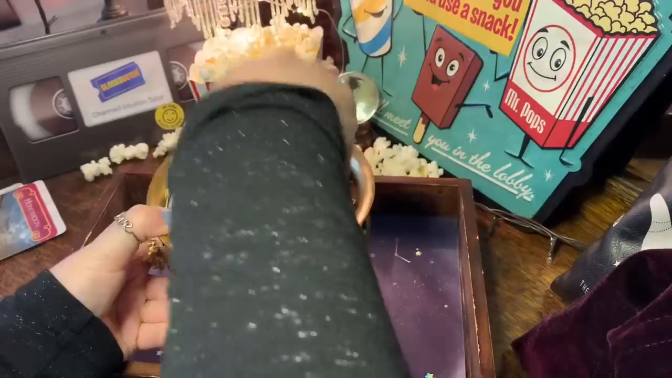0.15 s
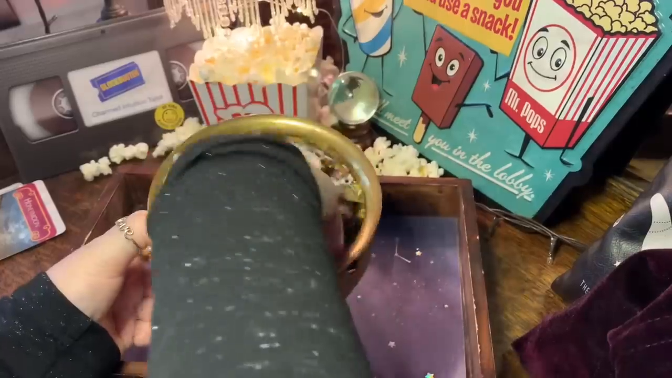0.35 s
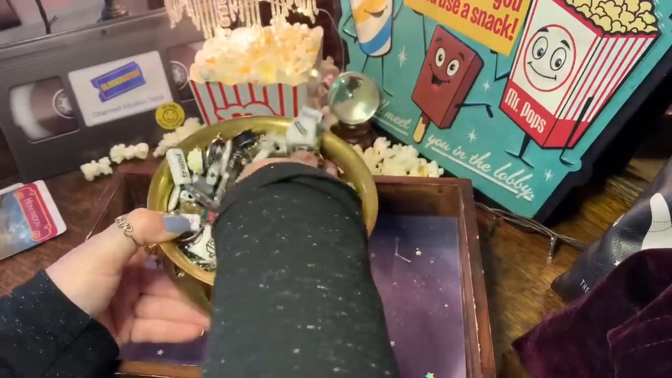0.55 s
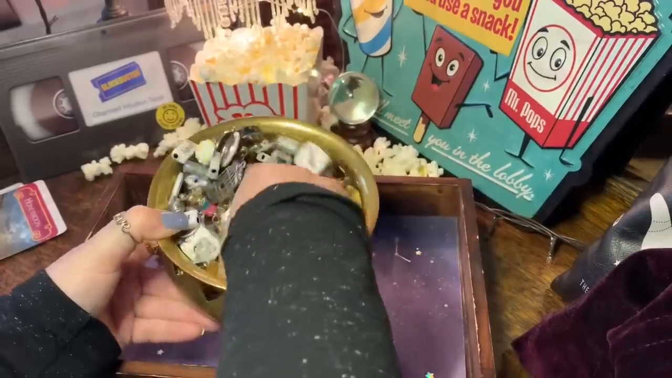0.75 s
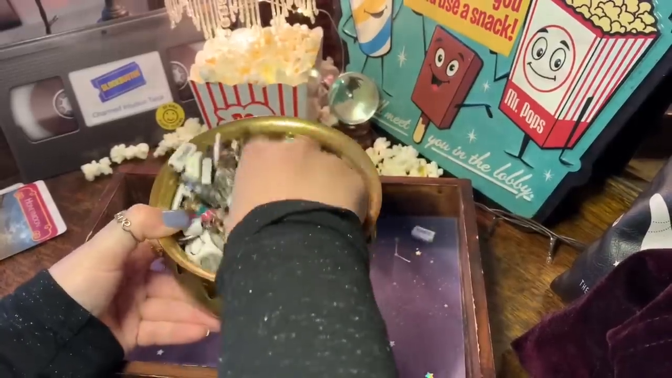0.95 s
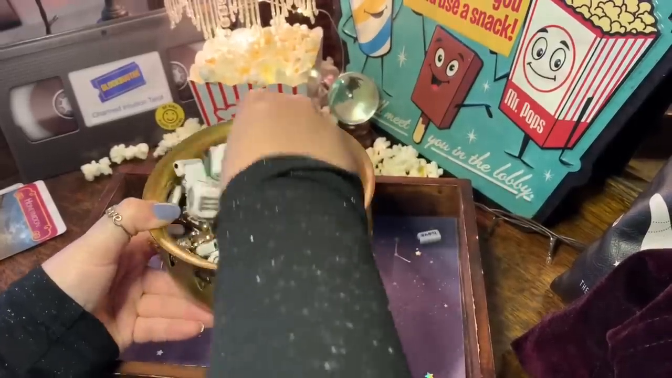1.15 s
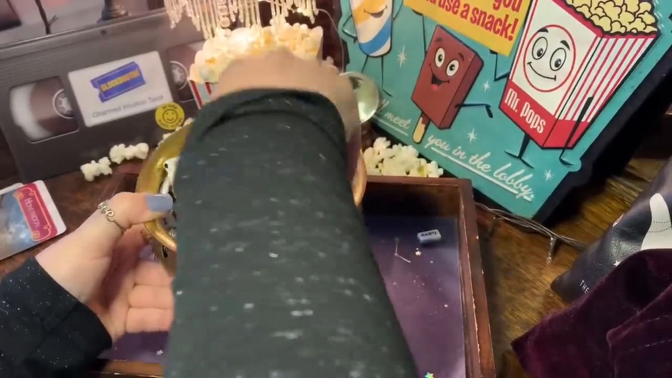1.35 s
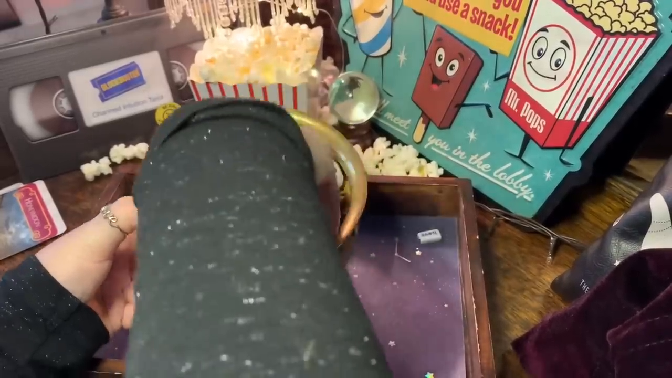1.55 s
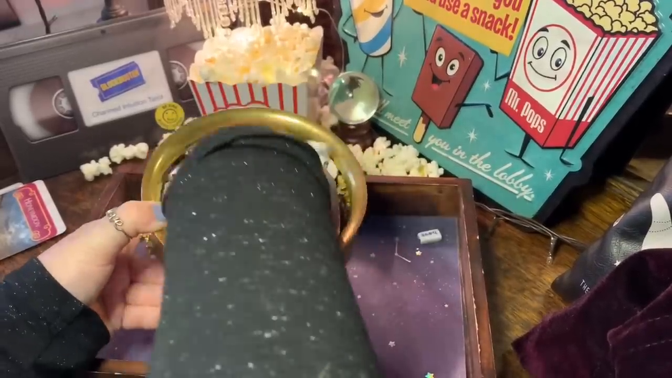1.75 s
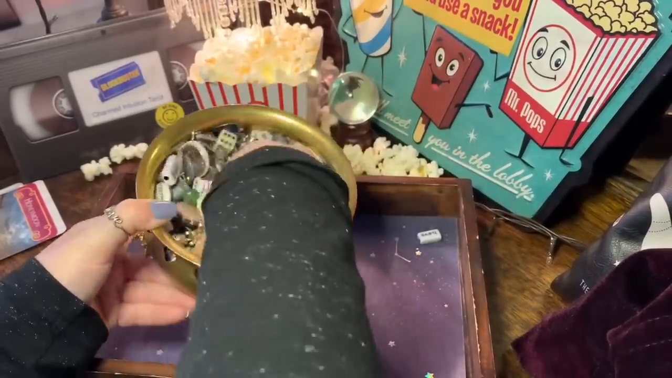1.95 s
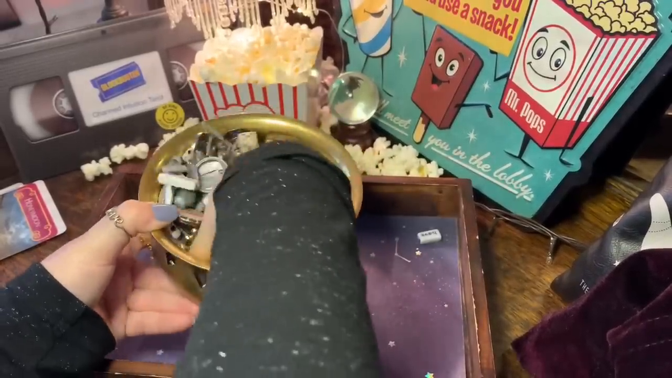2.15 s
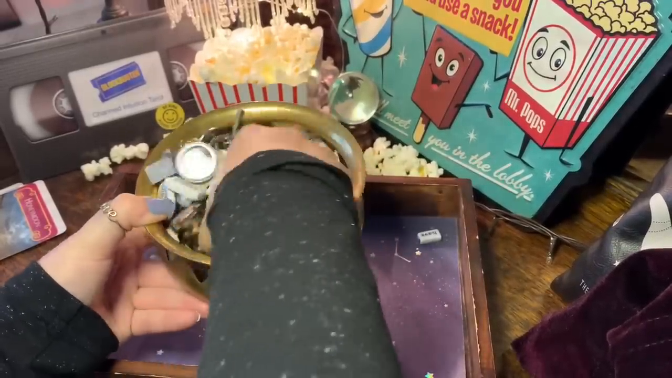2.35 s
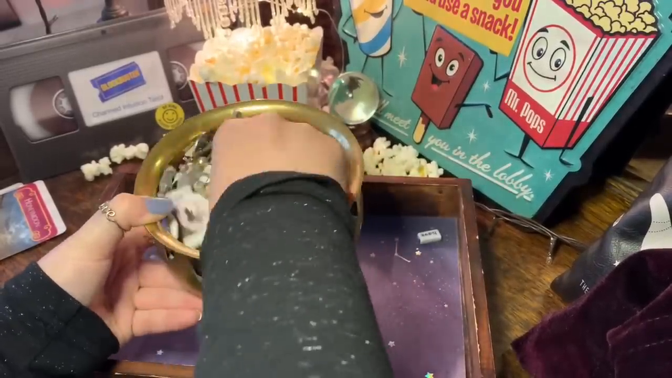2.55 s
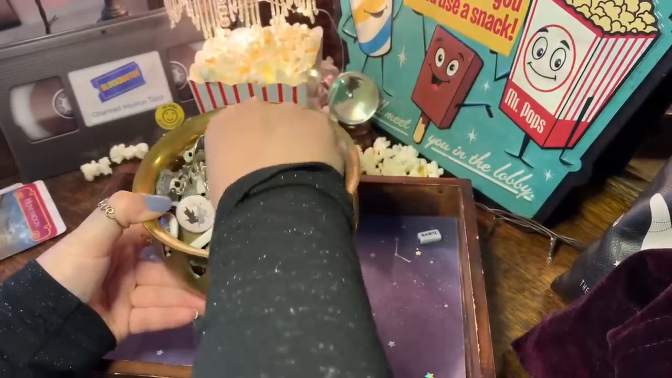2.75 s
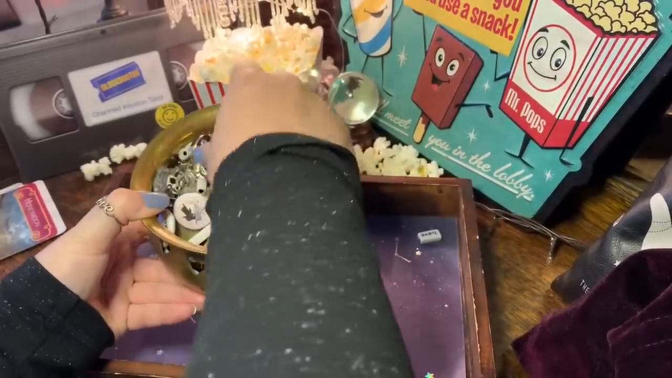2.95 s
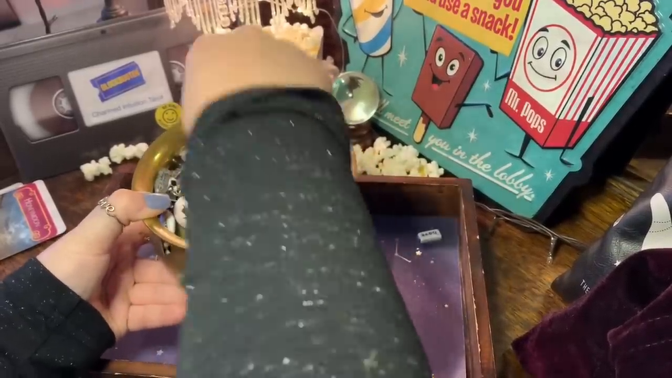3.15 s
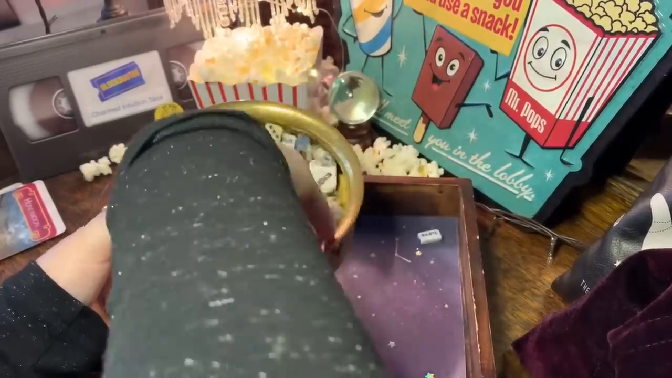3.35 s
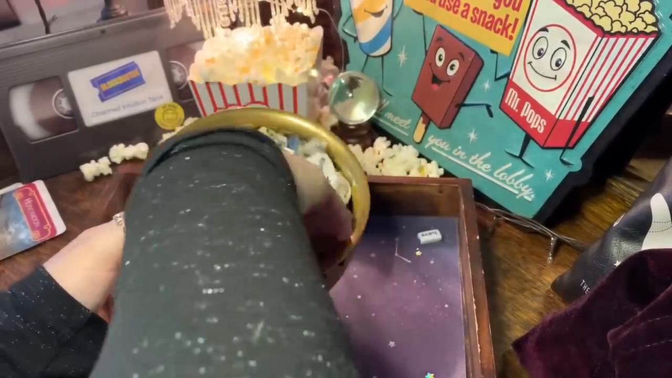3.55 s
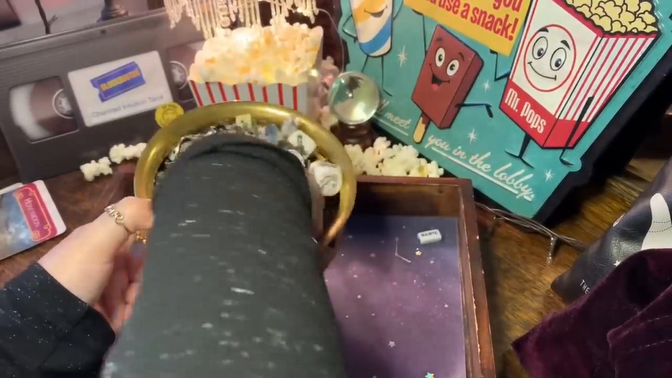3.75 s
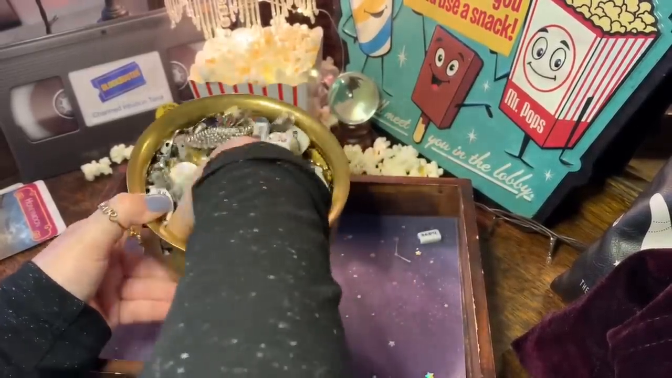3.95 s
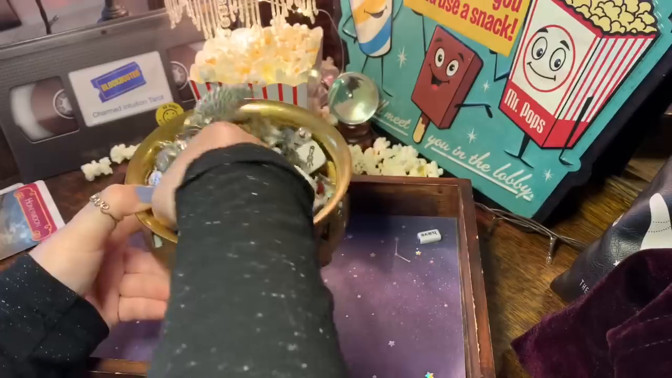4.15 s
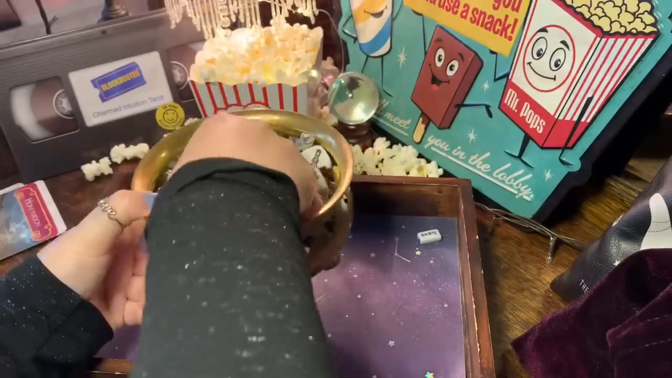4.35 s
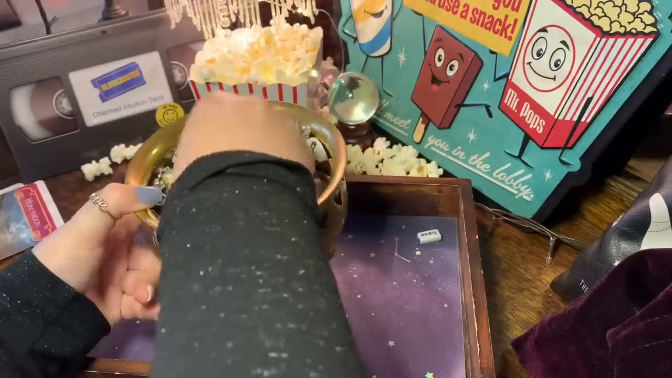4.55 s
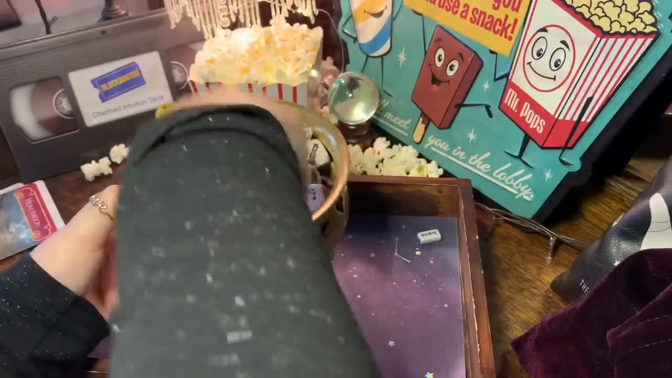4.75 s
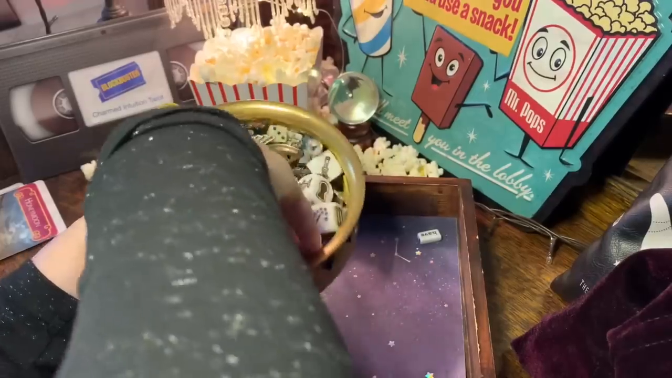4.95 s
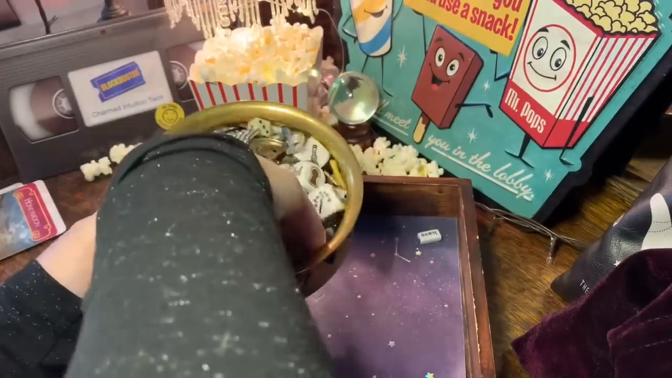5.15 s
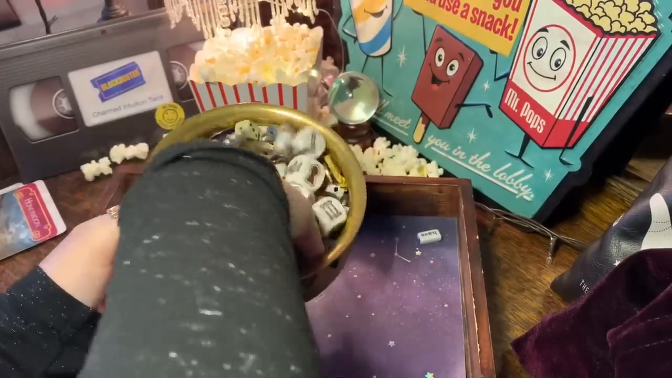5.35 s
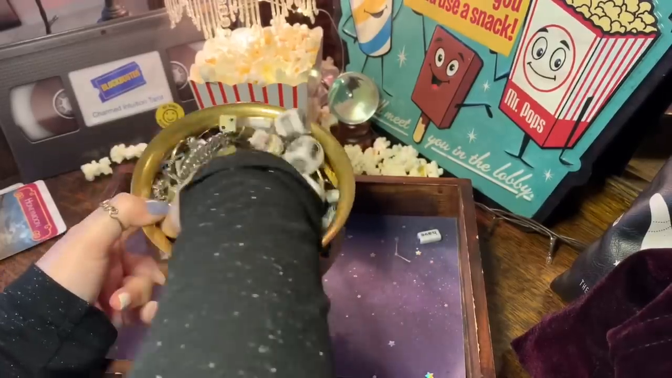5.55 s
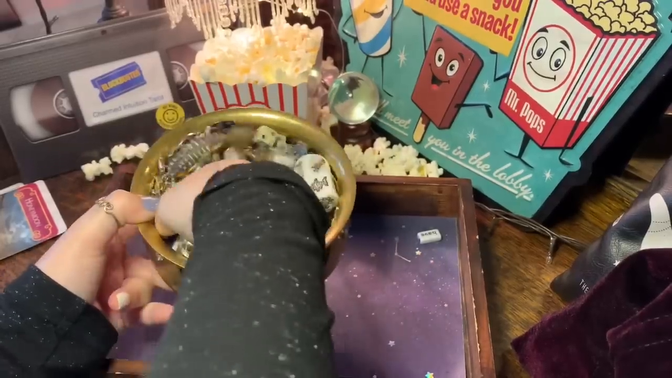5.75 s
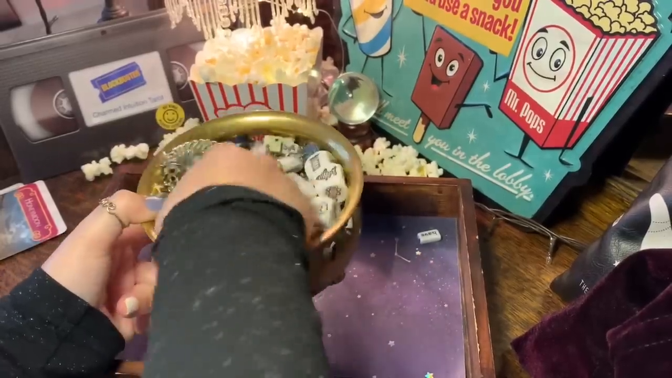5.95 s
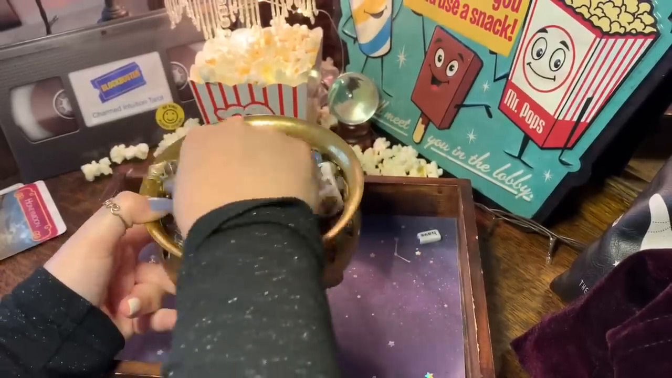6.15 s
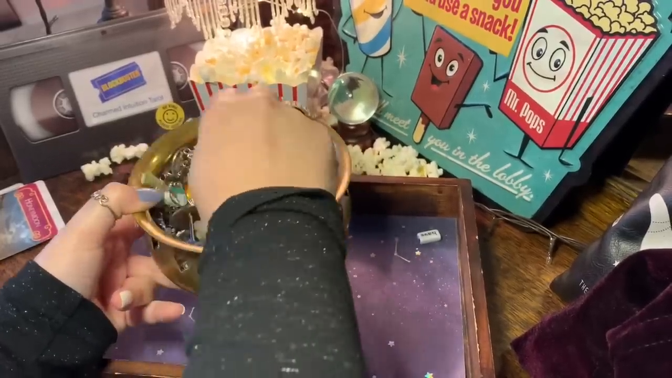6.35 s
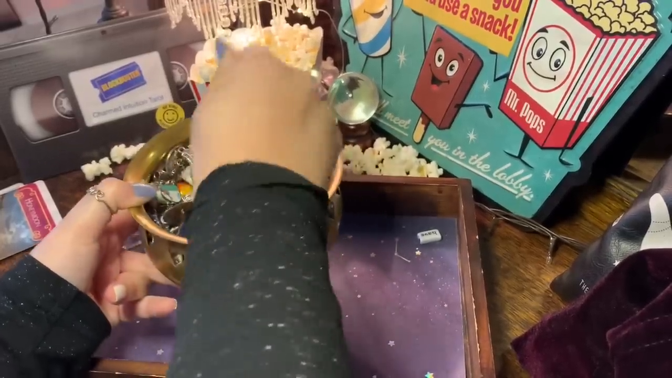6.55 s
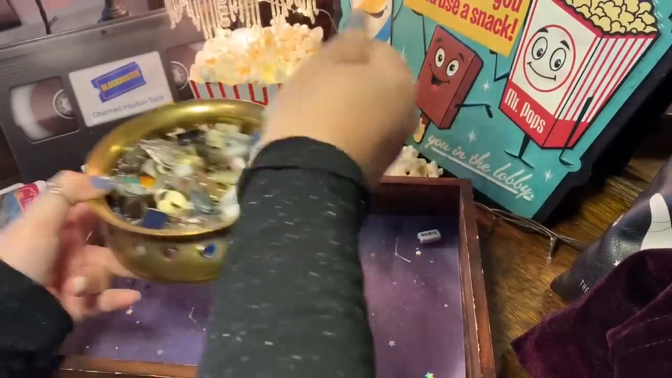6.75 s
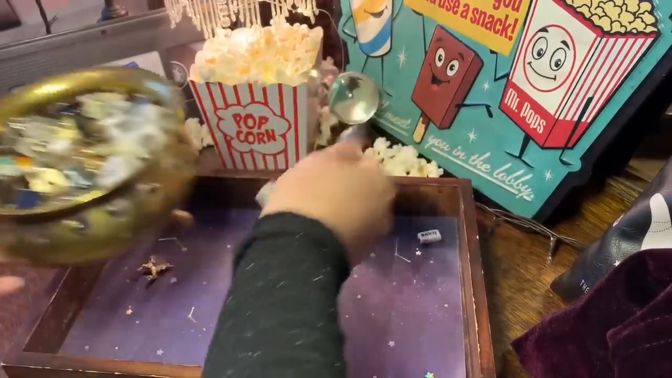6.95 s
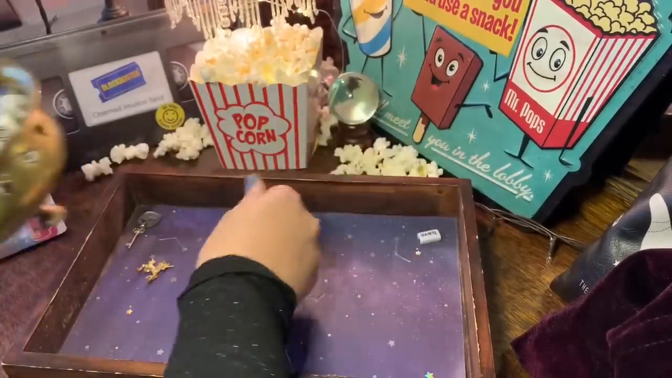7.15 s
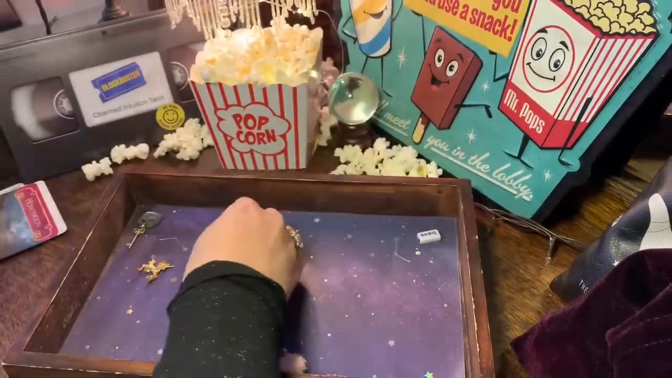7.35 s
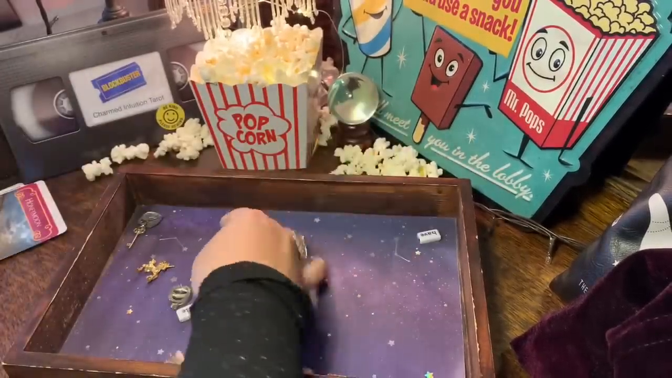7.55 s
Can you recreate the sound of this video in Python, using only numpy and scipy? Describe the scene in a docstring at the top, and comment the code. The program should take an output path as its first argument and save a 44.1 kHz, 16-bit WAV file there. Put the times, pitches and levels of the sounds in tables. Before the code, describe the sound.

Dense, glittering clinks of trinkets churned in a brass bowl, a few woody bumps, a brief pause, then a short rattling drop onto wood.

```python
"""Stirred charms in a brass bowl

A hand stirs small metal charms and tiles in a brass bowl held over a wooden tray, in a small room.
The heap jangles by dense random contacts; single charms clink, and click-driven modes make metal ring.
The bowl bumps the tray a few times, exciting its wooden modes. After a short pause a handful is let go
and clatters into the tray. Reflections and a low rumble of air, both filtered noise, surround it all."""
import sys
import numpy as np
from scipy import signal
from scipy.fft import rfft, irfft, next_fast_len
from scipy.io import wavfile
from scipy.ndimage import uniform_filter1d, map_coordinates

SR = 44100
rng = np.random.default_rng(int(sys.argv[2]) if len(sys.argv) > 2 else 0)


def digitize_waveform(pressure):
    """Quantize a signal to 16-bit integers and store it at the path in sys.argv[1].

    Rows of a 2-D input are taken as channels; values are limited to [-1, 1].
    """
    field = np.atleast_2d(pressure).T
    bounded = np.clip(field, -1, 1)
    quanta = np.round(bounded * 32767).astype(np.int16)
    wavfile.write(sys.argv[1], SR, quanta)


N = 336041
SIZE = next_fast_len(N + SR)  # transform length, with a second of space for the tails
HZ = np.arange(SIZE // 2 + 1) * SR / SIZE

# Modes of the brass bowl, damped by hand and heap.
# Each row: frequency in Hz, bandwidth in Hz, relative level in dB.
BOWL_MODES = [(759, 33, -12), (860, 70, -10.5), (1000, 60, -2), (1098, 38, 0), (1260, 60, -15),
              (1690, 50, -7.5), (1970, 70, -6.5), (2580, 90, -6), (4070, 77, -8), (7050, 200, -2)]
# Modes of the wooden tray above its lowest one.
# Each row: frequency in Hz, bandwidth in Hz, relative level in dB.
TRAY_MODES = [(220, 15, -5), (308.6, 23, -2), (351, 46, 0), (503, 67, -15.5), (678, 57, -2.5), (986, 43, 1),
              (1203, 150, -7), (1580, 160, 4), (1727, 31, -2.5), (1966, 500, 4.5)]
# Spectrum of the bright tick of charm on charm. Each row: frequency in Hz, relative density in dB.
TICK_SPECTRUM = [(1000, -73), (4000, -5.5), (6500, -0.5), (8200, 3), (10500, 2.5), (12500, 1.5),
                 (14500, -2.5), (15700, -1.5), (16000, -23)]
# Spectrum of the clack of pieces. Each row: frequency in Hz, relative density in dB.
CLACK_SPECTRUM = [(300, -24), (800, -6), (1500, -1), (2800, 2), (4200, 7.5), (6000, 4.5), (7500, -38.5),
                  (10000, -21), (16000, -33.5)]
# Spectrum of pieces rubbing or rattling on brass. Each row: frequency in Hz, relative density in dB.
RUB_SPECTRUM = [(150, -38.5), (400, -14), (700, -5), (1000, 5.5), (1400, -2), (2200, -7.5), (3200, -13.5),
                (6000, -1.5), (16000, -41.5)]
# Spectrum of blows on wood. Each row: frequency in Hz, relative density in dB.
WOOD_SPECTRUM = [(100, -29), (200, -1.5), (500, 1.5), (1000, -2), (2000, 7.5), (3000, 8.5), (4800, -2.5),
                 (7000, 0.5), (10000, -19), (16000, -36.5)]

JANGLE_FADE_S, CLACK_FADE_S = 0.0035, 0.0014  # amplitude time constants of one contact


def stirred_heap():
    """Granular contact: charms jangle, tiles clack and the heap drags over brass in many random impacts."""
    jangle, clack, rub = sliding()
    touches = collisions(per_s=700, spread_db=2.0)
    charm_hits, tile_hits = touches * jangle, touches * clack
    ticks = from_db(1.0) * colour(chatter(charm_hits, JANGLE_FADE_S), TICK_SPECTRUM)
    tiles = from_db(-8.5) * colour(chatter(tile_hits, CLACK_FADE_S, channels=2), CLACK_SPECTRUM)

    drag = collisions(per_s=400, spread_db=1.5) * rub
    brass = from_db(0.5) * bowl(collisions(per_s=130, spread_db=0.6) * rub)
    scrape = from_db(-9.0) * colour(chatter(drag, fade_s=0.00096, channels=2), RUB_SPECTRUM)

    rings = from_db(0.5) * charm_rings(charm_hits, 7930, 12640, width_hz=18, count=1, size=400)
    rings += from_db(-1.5) * charm_rings(charm_hits, 13400, 15600, width_hz=16, count=1, size=300)
    tile_rings = from_db(-5.0) * charm_rings(tile_hits, 3503, 7840, width_hz=17, count=2, size=300)
    tile_rings += from_db(-10.5) * charm_rings(tile_hits, 1487, 4540, width_hz=35, count=1)
    return ticks + tiles + brass + scrape + rings + tile_rings + tinks(jangle, clack)


def sliding():
    """Incoherent superposition: each push swells and settles, and overlapping slides add in power."""
    # Pushes of the hand. Each row: start in seconds, push length in seconds, settling time in seconds,
    # then relative levels in dB of charm jangle, tile clack and heap rubbing on brass.
    pushes = [(0.0, 0.0017, 0.21, -29.5, -38, -40.5), (0.194, 0.094, 0.4, -28.5, -32, -39),
              (0.394, 0.06, 0.15, -28, -30.5, -38), (0.538, 0.054, 0.26, -33.5, -34, -31.5),
              (0.664, 0.039, 0.17, -27, -30, -31), (0.799, 0.12, 0.19, -25, -27.5, -33),
              (1.02, 0.041, 0.66, -33.5, -37, -43), (1.204, 0.029, 0.17, -29.5, -39.5, -42.5),
              (1.447, 0.13, 0.11, -29, -31.5, -37.5), (1.88, 0.026, 0.24, -26.5, -28.5, -30),
              (2.027, 0.051, 0.15, -31.5, -32, -39.5), (2.2, 0.045, 0.46, -30, -30.5, -36),
              (2.318, 0.091, 0.54, -29.5, -35, -38), (2.5, 0.17, 0.39, -41, -54, -36.5),
              (2.925, 0.028, 0.15, -26, -31.5, -31), (3.04, 0.065, 0.22, -41, -41, -53),
              (3.184, .03, 0.68, -35, -40.5, -41), (3.312, 0.035, 0.15, -28.5, -30.5, -35),
              (3.468, 0.079, 0.25, -30, -31, -35.5), (3.683, 0.015, 0.29, -26, -27.5, -30.5),
              (3.865, 0.17, 0.68, -28, -30, -35.5), (4.366, 0.085, 1, -40, -42, -50),
              (4.564, 0.015, 0.11, -34.5, -37, -37.5), (4.704, 0.069, 0.23, -41, -43, -60),
              (4.781, 0.075, 0.086, -35.5, -37, -34), (4.92, 0.03, 0.22, -38.5, -42.5, -41),
              (5.118, 0.0083, 0.19, -33.5, -32.5, -36.5), (5.201, .1, 0.17, -33, -34, -38.5),
              (5.346, 0.074, 0.47, -26, -26, -32.5), (5.583, 0.1, 0.66, -30.5, -36.5, -42.5),
              (5.842, 0.065, 0.93, -29, -35, -34.5), (5.967, 0.088, 0.14, -35, -35, -50),
              (6.199, 0.026, 0.3, -37, -47, -50), (6.43, 0.013, 0.12, -52, -40, -61)]
    # The hand lying in the heap keeps it creeping. One row: jangle, clack and rub, relative levels in dB.
    creep_db = (-50, -49, -56)
    settle_drop_db, settle_bend = 27, 1.26  # drop within the settling time; slow at first, then faster
    hand_out_s, hand_lift_s = 6.62, 0.22  # motion is over at the first, having faded for the second
    t = np.arange(N) / SR
    power = from_db(creep_db)[:, None] ** 2 * np.ones(N)
    for start, push_s, settle_s, *levels_db in pushes:
        moving = (t >= start) & (t < start + push_s + 2 * settle_s)
        age = t[moving] - start
        swell = np.sin(np.pi / 2 * np.minimum(age / push_s, 1))
        settling = np.maximum(age - push_s, 0) / settle_s
        settle = from_db(-settle_drop_db * settling ** settle_bend)
        power[:, moving] += (from_db(levels_db)[:, None] * swell * settle) ** 2
    return np.sqrt(power) * np.clip((hand_out_s - t) / hand_lift_s, 0, 1)


def tinks(jangle, clack):
    """Sparse impact excitation: a sliding piece drops onto another with a tiny snap and a short ring."""
    drops = collisions(per_s=70, spread_db=0.5)
    charm_drops, tile_drops = drops * jangle, drops * clack
    snap = from_db(-6.5) * colour(charm_drops, TICK_SPECTRUM)
    snap += from_db(-12.0) * colour(tile_drops, CLACK_SPECTRUM)
    high = from_db(-4.0) * charm_rings(charm_drops, 9300, 12500, width_hz=40, count=2, size=100)
    low = from_db(-7.5) * charm_rings(tile_drops, 3500, 7500, width_hz=25, count=2, size=100)
    return snap + high + low


def clinks():
    """Hard impact: a broadband tick and clack excite the modes of the pieces and the bowl."""
    # Single charms striking. Each row: time in seconds, relative tick level in dB, relative clack level in dB.
    blows = [(0.016, -23, -51), (0.134, -29, -38), (0.246, -17, -29), (0.3, -14.5, -28), (0.392, -1.5, -37),
             (0.452, -4, -23.5), (0.539, -11, -27.5), (0.574, -14, -35), (0.641, -11, -8),
             (0.648, -12.5, -14), (0.691, -26, -31), (0.752, -25, -15), (0.770, -11, -15.5),
             (0.842, -18, -18.5), (1.049, -12, -38), (1.129, 0, -31), (1.236, -24, -40), (1.327, -6.5, -35),
             (1.431, -12, -26), (1.545, -23.5, -27), (1.694, -24, -54), (1.8, -21, -38), (1.895, -9.5, -24),
             (2.146, -7, -36), (2.225, -27, -25), (2.368, -19, -22), (2.479, -13, -29), (2.601, -27, -29),
             (2.653, -14, -32.5), (2.748, -26, -44), (2.940, -7, -25.5), (3.044, -6, -32.5),
             (3.201, -8, -32), (3.325, -10.5, -28), (3.433, -24, -37), (3.522, -20.5, -26),
             (3.558, -17, -26), (3.695, -6.5, -18.5), (3.759, -4, -25), (3.782, -9, -25),
             (3.797, -15, -20.5), (3.867, -11, -44), (3.922, -15.5, -34), (3.945, -25, -33),
             (3.976, -20, -26), (4.050, -7, -35), (4.256, -17.5, -24.5), (4.296, -9, -29),
             (4.393, -13.5, -42), (4.415, -14, -27), (4.448, -14, -29), (4.531, -7, -23), (4.589, -10, -41),
             (4.68, -21, -50), (4.712, -17, -29), (4.803, -12, -41), (4.855, -9, -25), (4.931, -10, -37),
             (5.040, -13, -24), (5.136, -8, -20.5), (5.273, -24, -32), (5.38, -5, -27), (5.576, -8.5, -22),
             (6.192, -6, -38), (6.229, -4, -37), (6.301, -21, -29), (6.339, -14.5, -42),
             (6.429, -31, -14.5), (6.44, -7, -17), (6.547, -28, -38), (6.619, -35, -54),
             (7.034, -25.5, -52), (7.230, -28, -14), (7.364, -19, -34), (7.388, -9.5, -18),
             (7.4085, -4.5, -20), (7.476, -20, -40), (7.513, -23, -38)]
    s, tick_db, clack_db = np.transpose(blows)
    tick, clack = strikes(s, tick_db), strikes(s, clack_db)
    out = from_db(11.0) * colour(chatter(biting(tick), fade_s=0.0058), TICK_SPECTRUM)
    burst = chatter(biting(clack), fade_s=0.0016)
    out += from_db(18.0) * colour(burst, CLACK_SPECTRUM)
    out += from_db(7.5) * body(burst, BOWL_MODES)
    out += from_db(11) * charm_rings(clack, 2300, 3600, width_hz=85, count=6, size=60)
    out += from_db(8.5) * charm_rings(tick, 6563, 15990, width_hz=15, count=8, size=60)
    out += from_db(9.5) * charm_rings(clack, 2350, 7340, width_hz=120, count=9, size=60)
    return out


def wall_knocks():
    """Impulse response: a piece thrown against the wall rings the bowl and rattles briefly on it."""
    # Pieces knocking on the brass wall. Each row: time in seconds, relative level in dB.
    knocks = [(0.096, -44), (0.264, -31), (0.301, -37.5), (0.935, -30.5), (1.238, -35), (1.446, -41),
              (1.643, -40.5), (1.897, -25.5), (2.563, -31), (2.945, -30), (3.335, -28.5), (3.391, -36),
              (3.471, -41), (3.643, -32.5), (3.697, -22), (3.944, -27.5), (4.583, -39.5), (5.137, -23.5),
              (5.274, -33.5), (5.694, -38), (5.976, -34), (6.037, -32), (6.137, -36), (6.234, -37),
              (6.345, -38)]
    blows = strikes(*np.transpose(knocks))
    rattle = colour(chatter(blows, fade_s=0.0061), RUB_SPECTRUM)
    return from_db(27) * bowl(blows) + from_db(21) * rattle


def bowl(x):
    """Modal resonance with Doppler-like bending: a varying delay shifts pitch as hand and heap press."""
    bend, bend_hz = 0.022, 11.55  # nominal pitch deviation as a share; upper rate of the drift
    lag = drift(bend_hz) * bend * SR / (2 * np.pi * bend_hz)  # samples
    return map_coordinates(np.ravel(body(x, BOWL_MODES)), [np.arange(N) - lag], order=3)


def chimes():
    """Free damped oscillation: a charm that swings free, or the bowl itself, holds one pure, exponentially
    dying note."""
    # Ringing charms, and at 6.441 s the bowl's faint 2425 Hz ring. Each row: start in seconds, pitch in Hz,
    # relative level in dB, 60 dB decay in seconds.
    notes = [(0.002, 9660, -19, .25), (0.002, 11260, -19.5, .23), (1.129, 6985, -33, .35),
             (1.226, 9850, -16, .18), (1.236, 12050, -18, .13), (1.251, 15330, -23, .25),
             (1.29, 11240, -25, .3), (2.96, 14880, -24, .25), (2.978, 15250, -20, .2),
             (3.046, 4590, -36, 1.1), (3.165, 4600, -37, .5), (3.167, 12400, -28, .3),
             (4.531, 12300, -35, .2), (6.228, 15130, -23, .2), (6.441, 14790, -25, .15),
             (6.441, 2425, -63, 1.6), (7.389, 14900, -25, .25), (7.409, 15350, -27, .25)]
    age, out = np.arange(SR) / SR, np.zeros(N)
    for s, hz, db, t60 in notes:
        at = max(round(s * SR), 0)
        note = from_db(db - 60 * age / t60) * np.sin(2 * np.pi * hz * age)
        out[at:at + len(age)] += note[:N - at]
    return out


def handful():
    """Modal excitation by impacts: landing pieces thud, knock and clack on the thin floor, then tumble."""
    # Pieces landing in the tray. Each row: time in seconds, then relative levels in dB
    # of the floor's thud, the wood's knock and the piece's clack.
    landings = [(7.1175, -46, -43, -47), (7.1222, -30, -20.5, -16), (7.125, -38, -26, -27),
                (7.141, -34, -27, -25), (7.1606, -23.5, -16, -19), (7.168, -26, -18, -31),
                (7.178, -26, -31, -21.5), (7.186, -34, -21.5, -22.5), (7.194, -33, -26, -29),
                (7.2182, -25.5, -13.5, -20), (7.230, -26, -21.5, -21.5), (7.238, -27, -18, -22),
                (7.2455, -26, -24, -20.5), (7.276, -28.5, -27.5, -22.5), (7.290, -26, -24.5, -33),
                (7.318, -26.5, -31, -34), (7.338, -26.5, -28, -25), (7.347, -26, -25.5, -24.5),
                (7.364, -24.5, -21.5, -17), (7.372, -33, -25, -22), (7.389, -29, -28, -18),
                (7.407, -27.5, -31, -29), (7.417, -38, -32, -24), (7.429, -40, -24.5, -23),
                (7.445, -30, -25, -30), (7.476, -29, -25.5, -31), (7.495, -34, -32, -37),
                (7.513, -28.5, -31, -25.5), (7.544, -34, -31, -32), (7.572, -39, -35, -38),
                (7.611, -41, -42, -32)]
    s, *levels_db = np.transpose(landings)
    thud, knock, clack = (strikes(s, db) for db in levels_db)
    clack = clack + tumbling(clack)
    floor = from_db(23.0) * body(thud, TRAY_MODES[:5]) + from_db(23) * tray_boom(thud)
    wood = from_db(20) * body(knock, TRAY_MODES[4:])
    wood += from_db(19.5) * charm_rings(knock, 907, 2900, width_hz=110, count=9, size=60)
    cracks = from_db(21) * colour(chatter(biting(clack), fade_s=0.002, channels=2), WOOD_SPECTRUM)
    pieces = from_db(17.5) * charm_rings(clack, 2230, 4960, width_hz=170, count=4, size=60)
    pieces = pieces + from_db(13) * charm_rings(clack, 5120, 12390, width_hz=17, count=4, size=60)
    return floor + wood + cracks + pieces


def tumbling(landings):
    """Energy dissipation: every landing sets off small random bounces that die exponentially."""
    level_db, t60_s = -35, 0.44  # level against the landing click
    r = from_db(-60 / (t60_s * SR)) ** 2
    unrest = np.sqrt(signal.lfilter([1], [1, -r], landings ** 2 + 1e-18))
    return from_db(level_db) * unrest * collisions(per_s=250, spread_db=0.5)


def bumps():
    """Coupled bodies: the bowl's foot thumps the tray, hollow modes answering under a dull wooden knock."""
    # Bowl against tray. Each row: time in seconds, then relative levels in dB
    # of thump, hollow body and wooden knock.
    blows = [(0.035, -43, -52.5, -45), (0.649, -28.5, -44, -51), (4.189, -40, -40, -30),
             (4.194, -26, -25.5, -32), (4.308, -42, -43, -23), (4.312, -35, -31.5, -22.5),
             (4.331, -52, -52, -29), (4.353, -42, -42, -24.5), (4.37, -44, -48, -31),
             (4.398, -42, -45, -26.5), (4.416, -52, -49, -26), (4.429, -54, -48, -31),
             (4.443, -51, -51, -29), (4.462, -46, -49, -27.5), (4.489, -48, -56, -31),
             (4.511, -43, -53, -38), (4.533, -55, -48, -31), (6.436, -29.5, -43, -25.5),
             (6.478, -36, -54.5, -34), (6.505, -47, -52.5, -38)]
    # Spectrum of the foot rattling on wood. Each row: frequency in Hz, relative density in dB.
    rattle_spectrum = [(120, -32.5), (230, -7), (420, -2), (750, -11.5), (1700, -6.5), (3000, -30.5),
                       (16000, -66)]
    knock_top_hz = 2510  # the broad foot gives a duller knock than a charm
    s, thump_db, hollow_db, knock_db = np.transpose(blows)
    boom = from_db(24) * tray_boom(strikes(s, thump_db))
    hollow_blows = strikes(s, hollow_db)
    hollow = from_db(27.5) * body(hollow_blows, TRAY_MODES[:5])
    hollow += from_db(25) * ring(hollow_blows, hz=300, width_hz=76)
    rattle = from_db(29.0) * colour(chatter(hollow_blows, fade_s=0.004), rattle_spectrum)
    knock = chatter(strikes(s, knock_db), fade_s=0.005)
    wood = from_db(15) * body(knock, TRAY_MODES[5:]) + from_db(22) * colour(knock, WOOD_SPECTRUM)
    dull = signal.butter(4, knock_top_hz, fs=SR, output="sos")
    return boom + hollow + signal.sosfilt(dull, wood + rattle)


def tray_boom(clicks):
    """Low-mode resonance: the tray's floor booms, and the table under it sways a little."""
    floor = ring(clicks, hz=171.9, width_hz=17)
    table = ring(clicks, hz=62.6, width_hz=13)
    return floor + from_db(-18.0) * table


def room(x, scatter_db=0):
    """Superposed paths: direct sound, one clear echo, moving scatter and a short tail, per microphone."""
    # Phase lead of the left channel over the right. Each row: frequency in Hz, phase lead in radians.
    stereo_phase = [(0, 0), (280, 0.7), (1290, 6.0), (1640, 12.5), (2760, 15.2), (5680, 22.6), (6370, 18.7),
                    (7670, 16.2), (9130, 15.4), (10400, 12.7), (11600, 12.4), (12600, 9.8), (14300, 9.0),
                    (15200, 6.2), (16600, 6.3)]
    # Scatter from nearby things. Each row: frequency in Hz, level against the direct sound in dB
    # before scatter_db is added.
    scatter_spectrum = [(100, -27), (250, -17.5), (500, 0.5), (1100, 0), (2500, 3.5), (5500, 5),
                        (7500, -4.5), (9000, -14), (16000, -5.5)]
    # Tail of the room. Each row: frequency in Hz, level against the direct sound in dB
    # before half of scatter_db is added.
    tail_spectrum = [(100, -17.5), (400, -4), (2000, -6), (5000, -4.5), (7500, -11), (9000, -24),
                     (12000, -20), (16000, -10)]
    echo_s, echo_db = 0.0056, -18.5
    lead = np.interp(HZ, *np.transpose(stereo_phase))
    echo = from_db(echo_db) * np.exp(-2j * np.pi * HZ * echo_s)
    direct = np.exp(0.5j * lead * np.array([[1], [-1]])) * (1 + echo)
    near = from_db(scatter_db) * response(scatter_spectrum)
    far = from_db(scatter_db / 2) * response(tail_spectrum)
    tail = far * reflections(t60_s=0.41, start_s=0.0096)
    heard = rfft(x, SIZE) * (direct + tail) + near * scattered(x)
    return irfft(heard / np.sqrt(1 + near ** 2 + far ** 2), SIZE)[:, :N]


def scattered(x, count=6):
    """Time-varying interference: as bowl and arm move, the peaks and hollows of scattered sound move."""
    shares = np.array([drift(8.65) for _ in range(count)])  # path changes up to about this rate in Hz
    shares = shares / np.linalg.norm(shares, axis=0)
    return sum(rfft(x * share, SIZE) * reflections(t60_s=0.058, start_s=0.00061) for share in shares)


def reflections(t60_s, start_s):
    """Diffuse field: the response of dense dying reflections, independent at the two microphones."""
    age = np.arange(SR // 2) / SR
    echoes = rng.standard_normal((2, len(age))) * from_db(-60 * age / t60_s) * (age > start_s)
    return rfft(echoes / np.sqrt(np.sum(echoes ** 2, axis=1, keepdims=True)), SIZE)


def air_rumble():
    """Partly coherent noise: a shared part and a weaker independent part per channel, shaped alike."""
    # Spectrum of the air's rumble. Each row: frequency in Hz, relative density in dB.
    rumble_spectrum = [(20, -30), (40, -30.5), (58, 7), (80, -1), (115, 1.5), (200, 1.5), (300, -12.5),
                       (700, -16.5), (2000, -25.5), (6000, -27.5), (9000, -44.5), (16000, -49)]
    noise = rng.standard_normal(N) + 0.37 * rng.standard_normal((2, N))
    return from_db(-59.0) * colour(noise, rumble_spectrum)


def strikes(times, db):
    """Impulse excitation: one click for each blow."""
    clicks = np.zeros(N)
    clicks[np.clip(np.round(times * SR).astype(int), 0, N - 1)] = from_db(db)
    return clicks


def collisions(per_s, spread_db):
    """Random impact process: clicks of uneven size, levelled to a steady local power."""
    sizes = from_db(spread_db * np.minimum(rng.exponential(1, N), 4)) * rng.choice([-1, 1], N)
    clicks = sizes * (rng.random(N) < per_s / SR)
    local_power = np.abs(uniform_filter1d(clicks ** 2, size=2600))
    return clicks / np.sqrt(local_power + 1e-4)


def biting(clicks):
    """Finite contact time: a hard contact builds up over a moment, keeping its energy."""
    r = np.exp(-1 / (0.00047 * SR))  # power peaks after this many seconds
    return np.sqrt(signal.lfilter([(1 - r) ** 2], [1, -2 * r, r * r], clicks ** 2 + 1e-18))


def chatter(clicks, fade_s, channels=1):
    """Micro-impacts: each click becomes a dying noise burst of the same expected energy."""
    r = np.exp(-2 / (fade_s * SR))
    envelope = np.sqrt(signal.lfilter([1 - r], [1, -r], clicks ** 2 + 1e-18))
    return rng.standard_normal((channels, N)) * envelope


def charm_rings(clicks, low_hz, high_hz, width_hz, count=3, size=160):
    """Modal synthesis: each click rings one of several unlike pieces, variously damped by the heap."""
    pitch, damping, share = rng.random((3, size, count, 1))
    age = np.arange(SR // 11)
    turns = 2 * np.pi * (low_hz + (high_hz - low_hz) * pitch) / SR
    fades = np.pi * width_hz * 2 ** (3 * damping - 1) / SR  # half to four times the given width
    heights = np.sqrt(8 * fades * share / count)  # slow and fast decays carry like energy
    partials = heights * np.exp(np.float32(-fades * age)) * np.cos(np.float32(turns * age))
    pieces = np.sum(partials, axis=1) * np.cos(np.pi / 2 * age / len(age))  # silent by the end
    dealt, out = rng.integers(0, size, N), np.zeros(N + len(age))
    for at in np.flatnonzero(clicks):
        out[at:at + len(age)] += clicks[at] * pieces[dealt[at]]
    return out[:N]


def ring(x, hz, width_hz):
    """Damped resonance: one two-pole mode that keeps the power of a white signal."""
    r = np.exp(-np.pi * width_hz / SR)
    zeros = np.sqrt((1 - r * r) / 2) * np.array([1, 0, -1])
    poles = [1, -2 * r * np.cos(2 * np.pi * hz / SR), r * r]
    return signal.lfilter(zeros, poles, x + 1e-18)


def body(x, modes):
    """Modal superposition: parallel modes of alternating sign, scaled by their total power."""
    total = np.sqrt(sum(from_db(db) ** 2 for hz, width, db in modes))
    rings = ((-1) ** k * from_db(db) * ring(x, hz, width) for k, (hz, width, db) in enumerate(modes))
    return sum(rings) / total


def colour(x, points):
    """Linear filtering: give a white signal a spectrum, keeping its power."""
    gain = response(points)
    return irfft(rfft(x, SIZE) * gain / np.sqrt(np.mean(gain ** 2)), SIZE)[..., :N]


def response(points):
    """Frequency response: gain interpolated in dB over log frequency from (Hz, dB) points."""
    hz, db = np.transpose(points)
    return from_db(np.interp(np.log(HZ + 1), np.log(hz), db))


def drift(rate_hz):
    """Low-passed noise: smooth slow chance with a spread of 1."""
    step = 50  # samples between slow values
    low_pass = signal.butter(2, rate_hz, fs=SR / step, output="sos")
    slow = signal.sosfilt(low_pass, rng.standard_normal(N // step + 2002))[2000:]  # skip the onset
    return np.interp(np.arange(N) / step, np.arange(len(slow)), slow / slow.std())


def from_db(db):
    """Logarithmic level: decibels to amplitude gain."""
    return 10 ** (np.asarray(db) / 20)


def scene():
    """Linear superposition: all the metal and wood in the room, over a low rumble of air."""
    metal = stirred_heap() + clinks() + wall_knocks() + chimes()
    wood = bumps() + handful()
    # the open tray throws back less than the inside of the bowl
    return room(metal) + room(wood, scatter_db=-4) + air_rumble()


def record(dry):
    """Band limiting: an elliptic low-pass cuts the top steeply at 15.9 kHz."""
    return signal.sosfilt(signal.ellip(10, 0.2, 90, 15900, fs=SR, output="sos"), dry)


dry = scene()
out = record(dry)
digitize_waveform(out)
```